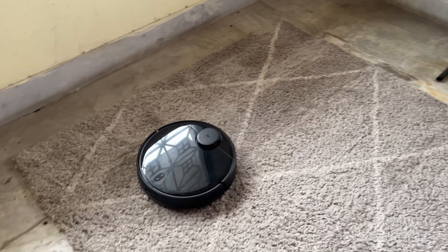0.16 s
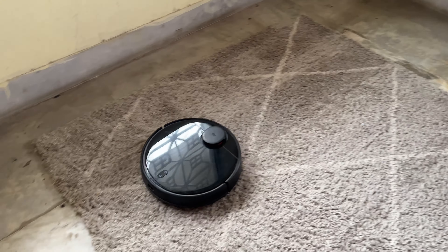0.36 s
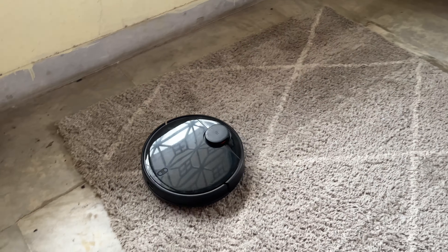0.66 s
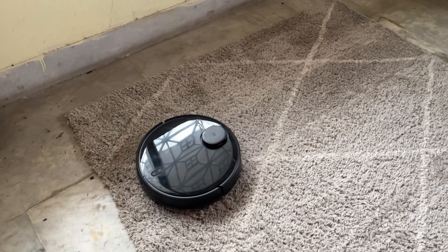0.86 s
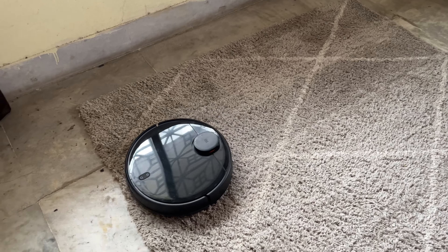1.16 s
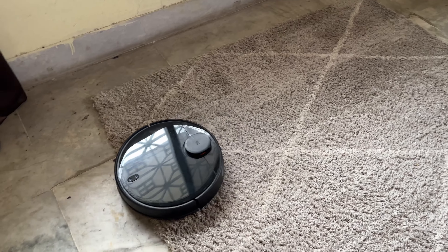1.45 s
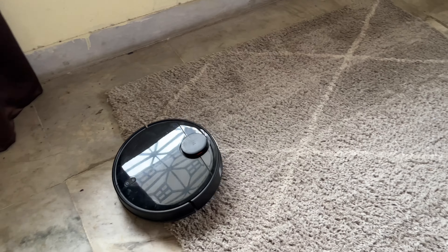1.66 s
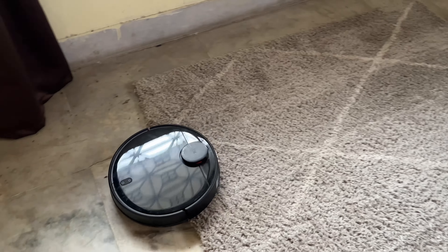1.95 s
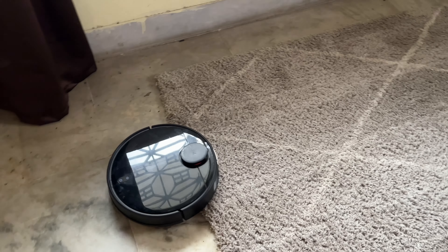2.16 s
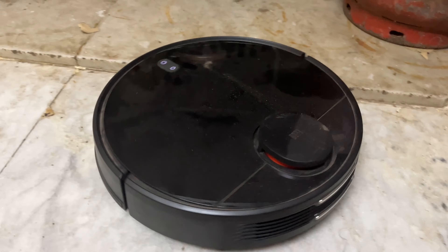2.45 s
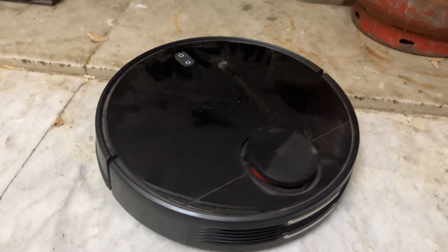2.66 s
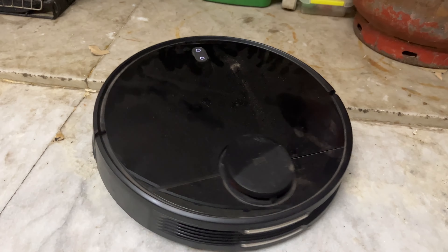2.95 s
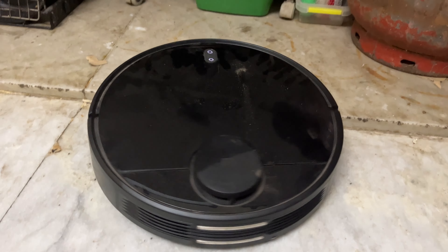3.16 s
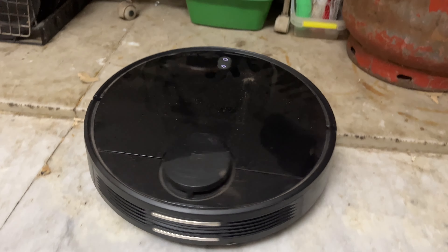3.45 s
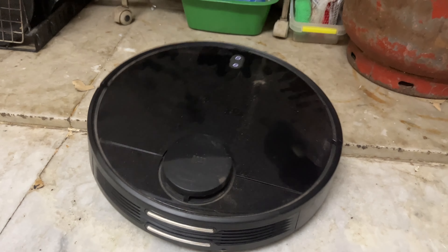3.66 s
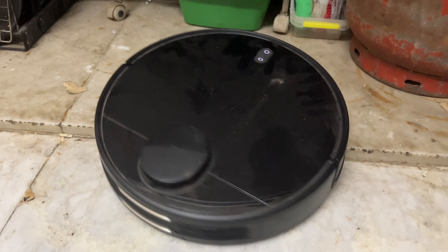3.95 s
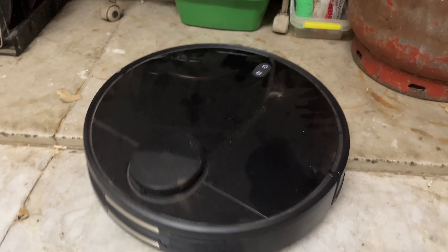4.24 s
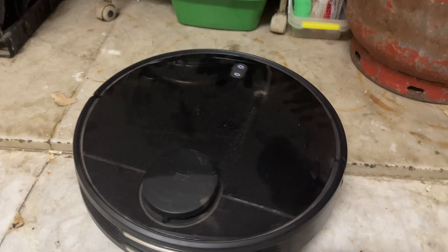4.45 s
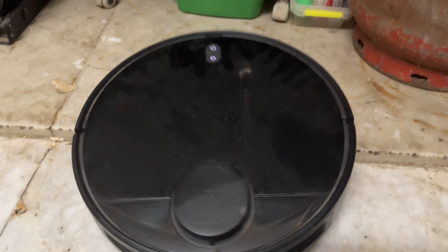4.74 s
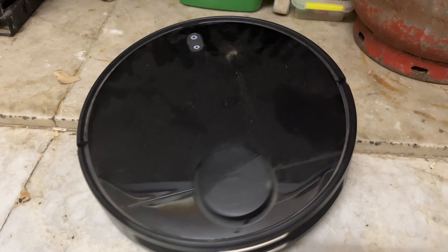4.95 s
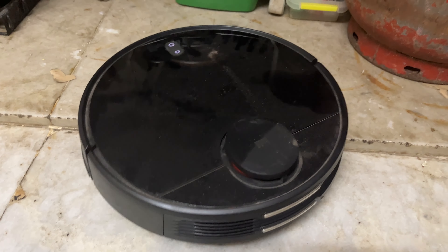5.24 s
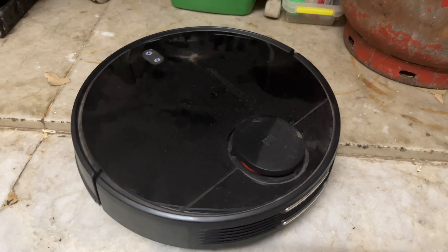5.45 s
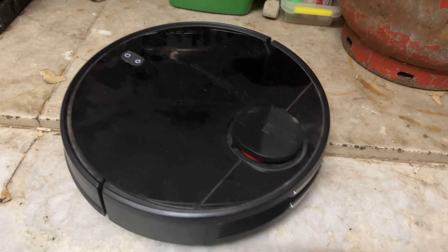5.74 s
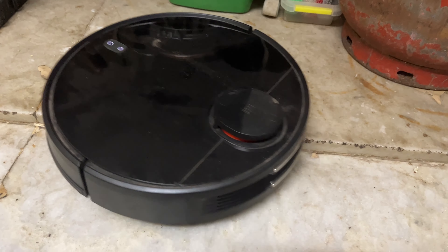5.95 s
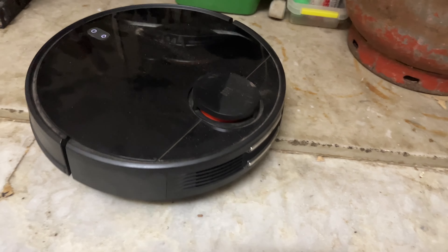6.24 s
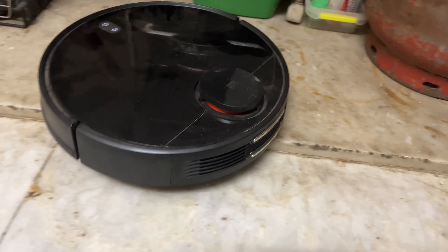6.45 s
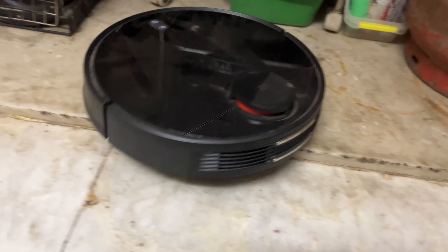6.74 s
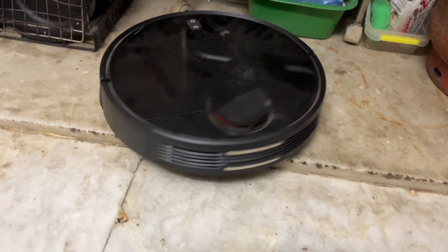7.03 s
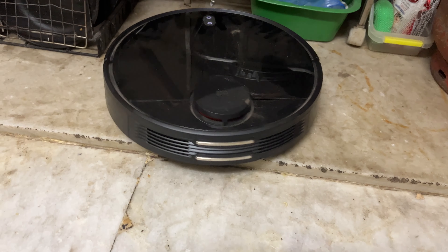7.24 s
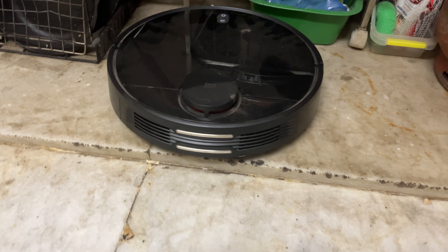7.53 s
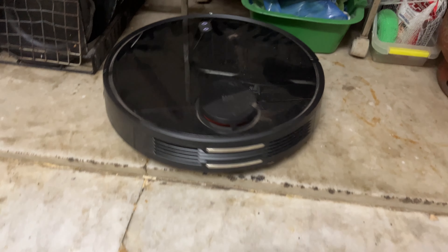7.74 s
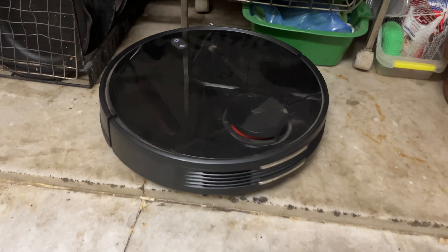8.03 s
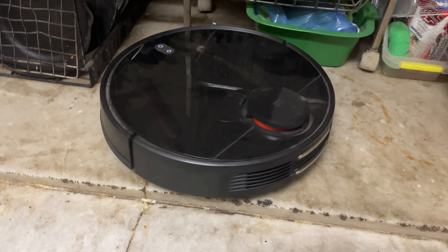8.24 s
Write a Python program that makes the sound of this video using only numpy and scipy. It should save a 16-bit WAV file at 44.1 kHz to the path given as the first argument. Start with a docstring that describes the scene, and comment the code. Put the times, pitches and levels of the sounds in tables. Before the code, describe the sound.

A robot vacuum works indoors, heard in stereo without a break in its motor. From 0 to 2.4 s it is a few steps away on carpet: soft airy drone, low fan hum, thin steady whine and a fluttering, breaking roller tone around the middle pitches. Muffled bumps come at about 1.8-1.9 and 2.3 s. At 2.4 s the sound jumps close, onto hard tile, louder and fuller, with rushing air, brush rasp and uneven wheel rumble. Hollow plastic knocks cluster at 2.8 and 3.3 s; the sharpest crack starts a clatter at 3.9-4.1 s, where airy whoosh and whine swell. More knocks land around 4.6, 4.75 and 5.1 s, with short echoes. The whirring then runs on, softer rattles returning at 6.7-7.2 s. From 7.4 s a deep boom pulses under the motor until the end at about 8.4 s.

```python
"""A small robot vacuum indoors: a few steps away on carpet, then from 2.4 s close by on a tiled floor.
Air and wheels are noise shaped in five layers; motor, fan, blades, roller and boom are wavering partials.
Knocks over joints and sills are noise blows into resonances of the shell, with sparse room echoes.
A stereo pair of ports is built as sum and difference, each with its own colour."""
import sys
import numpy as np
from scipy import signal
from scipy.fft import rfft, irfft
from scipy.io import wavfile
from scipy.ndimage import uniform_filter1d

SR = 44100
rng = np.random.default_rng(int(sys.argv[2]) if len(sys.argv) > 2 else 0)


def persist_wave(psi):
    """Save psi, clipped to +-1, as 16-bit WAV."""
    counts = np.round(np.clip(psi, -1, 1) * 32767).astype(np.int16)
    wavfile.write(sys.argv[1], SR, np.atleast_2d(counts).T)


N = 369116
CLOSE_S = 2.4  # the scene changes at once from far to close: far tables before, near tables after


def amp(db):
    """Gain for a level in dB."""
    return 10 ** (np.asarray(db) / 20)


def unit_rms(x):
    """Scales to rms 1."""
    return x / np.sqrt(np.mean(x ** 2) + 1e-20)


def at_frequencies(table, hz):
    """Columns of a spectral table, interpolated on a log-frequency axis."""
    f, *columns = np.transpose(table)
    return np.squeeze([np.interp(np.log(hz + 1), np.log(f + 1), c) for c in columns])


def at_samples(rows):
    """Sample indices spanned by a time table, and its columns at each of them."""
    s, *columns = np.transpose(rows)
    at = np.arange(round(s[0] * SR), min(round(s[-1] * SR), N))
    return at, np.array([np.interp(at / SR, s, c) for c in columns])


def wander(count, rate_hz):
    """Slow random curve: smoothed noise of rms 1, stepped every 64 samples."""
    steps = rng.standard_normal(N // 64 + 2)
    width = max(round(SR / 64 / rate_hz), 1)
    smooth = unit_rms(uniform_filter1d(uniform_filter1d(steps, width), width))
    return np.interp(np.arange(count) / 64, np.arange(len(steps)), smooth)


def peak(hz, centre_hz, width_hz):
    """Resonance curve of height 1, falling to half at half the width."""
    return 1 / (1 + (2 * (hz - centre_hz) / width_hz) ** 2)


def resonance(hz, centre_hz, width_hz):
    """Spectrum of a steep causal resonance."""
    return 1 / (1 + 2j * (hz - centre_hz) / width_hz) ** 2 / np.sqrt(width_hz)


def tone(hz, db, waver_db, drift, side_gain, rate_hz=8.0):
    """Partial wavering in level and pitch; its port difference is shifted about a quarter turn from the sum."""
    turns = np.cumsum(hz * (1 + drift * wander(len(hz), 2.92 * rate_hz))) / SR + rng.random()
    level = np.sqrt(2) * amp(db + waver_db * wander(len(hz), rate_hz))
    phase = 2 * np.pi * turns
    return level * np.array([np.cos(phase), side_gain * np.cos(phase + 1.6)])


# port difference relative to sum: f/Hz, level/dB
SIDE_COLOUR = [(50, -5), (130, -14.5), (300, -14.5), (600, -5.5), (1200, 0.5), (2200, -4.5), (4000, -3.5),
               (6500, 0.5), (9700, -0.5), (14400, 3)]
# share of the difference that follows the sum: f/Hz, in-step share [-], quarter-turn share [-]
SIDE_LINK = [(100, .1, 0.17), (500, 0.26, 0.39), (1190, 0.26, 0.64), (4000, 0.29, 0.39), (8000, 0.01, 0.51),
             (14000, 0.01, 0.44)]


def port_difference(near, diffuse):
    """Difference spectrum: part follows the sum, the rest is diffuse, at constant total power."""
    hz = np.linspace(0, SR / 2, len(near))[:, None]
    step, quarter = at_frequencies(SIDE_LINK, hz[:, 0])[..., None]
    linked = (step + 1j * quarter) * near
    free = np.sqrt(1 - step ** 2 - quarter ** 2) * diffuse
    return amp(at_frequencies(SIDE_COLOUR, hz[:, 0]))[:, None] * (linked + free)


# These five tables hold one entry per place (far, near).
# spectrum of the port sum: f/Hz, level/dB per Hz
SUM_COLOUR = [
    [(40, -27), (56, -7), (120, -1), (260, -6.5), (437, -8.5), (700, -19.5), (1030, -8.5), (1560, -23),
     (2430, -17), (4000, -23), (7400, -30.5), (9900, -54), (13200, -47), (15500, -64)],
    [(40, -29), (60, -11), (92, 0), (135, -1.5), (300, 1), (480, -3.5), (953, -3.5), (1550, -11.5),
     (2400, -13.5), (3880, -19.5), (7240, -27), (9890, -54.5), (13200, -50.5), (15500, -64)],
]
# casing and duct resonances: f/Hz, width/Hz, level/dB
DUCT_MODES = [
    [(321, 14, 5.5), (480, 98, 3), (777, 10, -4), (1760, 37, 3.5), (2400, 82, 7), (3350, 81, 4),
     (3820, 190, 5.5)],
    [(316, 7.9, 4.5), (350, 81, 4), (458.2, 9.2, 15), (548.4, 23, 9.5), (751, 3.8, 6), (1075, 43, 4),
     (2257, 125, 5), (2494, 360, 5), (3070, 60, -3), (3830, 280, 3)],
]
# air stream: t/s, body drone level/dB, brush rasp level/dB, air hiss level/dB, exhaust fizz level/dB
STREAM_LEVELS = [
    [(0, -49, -54, -59, -66.5), (.45, -47.5, -53, -58, -66.5), (.85, -48.5, -53, -57.5, -66.5),
     (1.25, -48.5, -53.5, -57.5, -68), (1.9, -45.5, -52, -54.5, -65), (2.4, -43.5, -51, -54.5, -65.5)],
    [(2.4, -44, -47.5, -47.5, -53), (2.45, -40.5, -45.5, -48.5, -54.5), (2.58, -39.5, -44, -48.5, -57.5),
     (2.7, -43.5, -43, -48, -56.5), (2.95, -40, -42, -50, -54.5), (3.17, -43, -43, -48.5, -56.5),
     (3.42, -41.5, -42.5, -44.5, -53.5), (3.85, -44, -44, -47.5, -56), (4.15, -43, -47, -47.5, -54),
     (5.0, -43, -44, -47.5, -54.5), (5.5, -42.5, -44.5, -48, -57.5), (5.85, -43.5, -43, -47, -54.5),
     (6.4, -43, -43.5, -45, -54), (6.9, -41.5, -43, -50, -55), (7.35, -44, -44.5, -46, -52),
     (7.9, -47, -47.5, -47, -53.5), (8.37, -45, -43.5, -51.5, -57.5)],
]
# swells as the outlet turns: t/s, whoosh level/dB, sizzle level/dB
OUTLET_SWELLS = [
    [(0, -0.5, 1.5), (1.2, -0.8, 0.3), (2.4, 0.7, -2)],
    [(2.4, -0.3, -1), (2.85, -4.3, 1.5), (3.16, -0.8, 4.5), (3.4, -3, 3.5), (3.76, -5, 3.5), (4.1, 8, 1),
     (4.4, 6.5, 1), (4.96, 2.6, 1), (5.4, -0.6, -0.5), (5.8, .3, -3.5), (6.17, -1.2, -1), (6.5, -3, -5.5),
     (6.9, .3, 1), (7.2, 3, -1), (7.52, 5, -3.5), (8.37, 0, -1)],
]
# wheel rumble: t/s, f/Hz, level/dB
WHEEL_RUMBLE = [
    [(0, 105, -54), (.6, 102, -54.5), (1.35, 101, -57), (1.6, 76, -53), (1.9, 97, -50.5), (2.4, 90, -57.5)],
    [(2.4, 88, -48), (2.75, 79.5, -44.5), (2.95, 90, -48.5), (3.3, 90, -41.5), (3.6, 105, -48.5),
     (3.9, 106, -46.5), (4.08, 86.5, -38), (4.4, 84.5, -49), (4.8, 91.4, -38.5), (5.12, 90.5, -48.5),
     (5.45, 96, -41), (6.35, 99, -51.5), (6.75, 105, -46.5), (7.25, 93.5, -46), (7.7, 93, -40.5),
     (7.95, 96, -43.5), (8.12, 99.5, -44.5), (8.37, 99, -43.5)],
]
WHEEL_PEAK_DB, WHEEL_WIDTH_HZ = (3.5, 11.5), 28  # peak: far, near
LAYER_EDGES_HZ = (0, 170, 900, 3000, 8500, 30000)  # wheels, drone, rasp, hiss, fizz
GUSTS_DB = (0.3, 1.12, 0.26, 0.75, 0.99)  # rms, per layer
OUTLET_HZ, OUTLET_WIDTH_HZ = (2660, 5100), (680, 1020)  # whoosh, sizzle


def air_and_wheels():
    """Turbulence and rolling: gusting noise layers coloured by ducts, wheels and drifting patches."""
    out, hz = np.zeros((2, N)), np.fft.rfftfreq(2048, 1 / SR)
    places = zip(STREAM_LEVELS, OUTLET_SWELLS, WHEEL_RUMBLE, WHEEL_PEAK_DB, SUM_COLOUR, DUCT_MODES)
    for stream, outlet, rumble, peak_db, colour, ducts in places:
        at, air_db = at_samples(stream)
        wheel_hz, wheel_db = at_samples(rumble)[1]
        frames = np.minimum(np.arange(len(at) // 512 + 6) * 512, len(at) - 1)
        a, b, c, d, patches = rng.standard_normal((len(frames), 1025, 5)).T
        near, diffuse = a + 1j * b, c + 1j * d

        # standing waves shift as the machine turns
        patches_db = 2.18 * unit_rms(uniform_filter1d(uniform_filter1d(patches, 6, 0), 25, 1))
        colour_db = at_frequencies(colour, hz) + sum(db * peak(hz, f, w) for f, w, db in ducts)
        wheels_db = peak_db * peak(hz[:, None], wheel_hz[frames], WHEEL_WIDTH_HZ)
        shape = amp(colour_db[:, None] + wheels_db + patches_db)

        layers = zip(LAYER_EDGES_HZ, LAYER_EDGES_HZ[1:], (wheel_db, *air_db), GUSTS_DB)
        for lo, hi, db, gust_db in layers:
            band = (hz >= lo) & (hz < hi)
            gain = amp(db + gust_db * wander(len(at), 27.0))[frames]
            shape[band] *= gain / np.sqrt((shape[band] ** 2).sum(0).mean())
        level = np.sqrt((shape ** 2).sum(0).mean())

        swells_db = sum(db[frames] * np.exp(-((hz[:, None] - f) / w) ** 2)
                        for db, f, w in zip(at_samples(outlet)[1], OUTLET_HZ, OUTLET_WIDTH_HZ))
        z = shape * np.array([near, port_difference(near, diffuse)]) * amp(swells_db)
        noise = signal.istft(z, nperseg=2048, noverlap=1536)[1][:, :len(at)]
        out[:, at] += noise * level / noise[0].std()  # swells tilt the balance, mean level holds
    return out


# one curve per place: t/s, 2nd-order f/Hz, order 2 level/dB, order 4 level/dB, order 6 level/dB
MOTOR_WHINE = [
    [(0, 1432, -78, -66, -80), (.14, 1432, -75, -69, -77), (.3, 1432, -73, -63, -76),
     (.54, 1432, -78, -61, -76), (.66, 1433, -76, -76, -69), (.79, 1433, -72, -62, -75),
     (1.0, 1432, -65, -60, -70), (1.12, 1432, -68, -71, -67), (1.25, 1432, -68, -55.5, -64),
     (1.5, 1434, -65, -62, -76), (1.64, 1436, -60, -72, -69), (1.85, 1432, -60, -58, -70),
     (2.05, 1432, -54.5, -62, -74), (2.27, 1432, -57, -61, -66), (2.4, 1432, -58, -66, -72)],
    [(2.4, 1408, -61, -60, -72), (2.7, 1401, -60, -60, -61), (2.95, 1401, -51.5, -62, -65),
     (3.15, 1400, -48, -61, -64), (3.3, 1400, -53, -52.5, -55), (3.65, 1400, -57.5, -59, -56.5),
     (3.85, 1400, -54, -65, -66), (4.07, 1406, -44, -70, -64), (4.09, 1408, -43, -55, -62),
     (4.16, 1410, -43.5, -50.5, -57), (4.3, 1411, -42, -48.5, -57), (4.5, 1411, -47.5, -53, -65),
     (4.6, 1411, -48, -53, -63), (4.72, 1411, -53, -56, -57), (4.95, 1409, -59, -80, -54),
     (5.3, 1411, -57, -65, -60), (5.5, 1412, -53.5, -59, -62), (5.8, 1412, -51, -55, -68),
     (6.1, 1410, -54, -62, -58), (6.45, 1406, -55, -62, -67), (6.7, 1403, -48.5, -59, -55),
     (7.0, 1401, -53.5, -69, -58), (7.35, 1407, -55, -57, -59), (7.55, 1409, -52, -60, -66),
     (7.72, 1409, -47.5, -59, -76), (8.0, 1405, -53.5, -64, -77), (8.15, 1403, -62, -57, -63),
     (8.37, 1400, -53, -70, -62)],
]
# motor orders wavering about one fixed level per place: order [-], far level/dB, near level/dB
FIXED_LEVEL_ORDERS = [(.5, -64.5, -57), (2.5, -79, -60), (3, -71, -91), (9, -68.5, -63.5), (10, -74, -86),
                      (15, -88, -72), (18, -78, -66)]


def motor():
    """Motor whine: thin partials at multiples of one shaft speed."""
    out = np.zeros((2, N))
    for place, rows in enumerate(MOTOR_WHINE):
        at, (second_hz, *levels_db) = at_samples(rows)
        for k, (db, waver_db) in enumerate(zip(levels_db, (2.2, 3.5, 3.5))):
            out[:, at] += tone((k + 1) * second_hz, db, waver_db, 0.0013, 0.85, rate_hz=14.0)
        for order, *place_db in FIXED_LEVEL_ORDERS:
            out[:, at] += tone(order * second_hz / 2, place_db[place], 4., 0.0013, 0.85, rate_hz=9.)
    return out


# t/s, shaft f/Hz, order 1 level/dB, order 2 level/dB
FAN_HUM = [(0, 212.9, -49.5, -65), (2.0, 214, -46, -57), (2.36, 212.6, -51, -76), (2.46, 217, -44, -40),
           (2.7, 212.1, -47.5, -56), (4.0, 212.4, -47.5, -51.5), (5.2, 212.1, -48.5, -66),
           (6.3, 214.6, -48, -69), (8.37, 213.2, -53, -65)]


def fan():
    """Fan hum: first two orders of the shaft speed."""
    out = np.zeros((2, N))
    at, (hz, first_db, second_db) = at_samples(FAN_HUM)
    out[:, at] += tone(hz, first_db, 0.91, 0.0065, 0.12)
    out[:, at] += tone(2 * hz, second_db, 3.5, 0.00603, 0.23)
    return out


BLADES_HZ, BLADES_DB = 13660, (-86, -70)  # level: far, near


def blades():
    """Thin top whistle of the blades: one unsteady partial."""
    at = np.arange(N)
    level_db = np.where(at < CLOSE_S * SR, *BLADES_DB)
    return tone(np.full(N, BLADES_HZ), level_db, 3., .002, 0.92, rate_hz=25.)


# roller singing in the pile: t/s, f/Hz, level/dB
ROLLER_SONG = [(0, 1045, -55), (.07, 1064, -46), (.13, 1058, -53), (.17, 1072, -49), (.19, 1050, -61),
               (.21, 1015, -47), (.26, 1018, -52), (.29, 1058, -47.5), (.37, 1064, -52), (.4, 1020, -58),
               (.43, 1018, -47), (.46, 1040, -57), (.5, 1070, -46), (.58, 1056, -45), (.72, 1065, -45.5),
               (.77, 1040, -58), (.82, 1048, -44), (.93, 1042, -49.5), (1.1, 1047, -51), (1.15, 999, -50),
               (1.24, 1000, -52), (1.32, 1025, -63), (1.44, 992, -48), (1.49, 1000, -61), (1.52, 995, -57),
               (1.58, 1004, -63), (1.65, 1021, -54), (1.7, 1030, -63), (1.77, 1030, -49), (1.84, 1045, -62),
               (1.95, 1000, -66), (2.05, 1009, -58.5), (2.16, 1005, -57), (2.24, 960, -55), (2.3, 930, -53),
               (2.4, 900, -62)]


def roller():
    """Roller singing in carpet pile: one partial that flutters and breaks."""
    out = np.zeros((2, N))
    at, (hz, db) = at_samples(ROLLER_SONG)
    out[:, at] += tone(hz, db, 2.2, 0.008, 0.53, rate_hz=65.)
    return out


# swells of the low boom: start t/s, length t/s, top level/dB
BOOM_SWELLS = [(1.501, 0.22, -55), (1.85, 0.63, -52.5), (2.423, 0.21, -56), (2.757, .14, -53),
               (3.203, 0.25, -51), (3.5, 0.22, -52), (3.928, 0.32, -51), (4.32, 0.11, -49),
               (4.564, 0.43, -53), (5.1, 0.96, -46.5), (6.265, 0.27, -48), (6.7, 0.46, -48.5),
               (7.39, 0.24, -32.5), (7.553, 0.24, -31), (7.813, 0.2, -34.5), (8.046, 0.23, -29),
               (8.2, 0.31, -36.5)]
BOOM_HZ, BOOM_IDLE_DB = 51.4, (-70, -56)  # idle: far, near
SWELL_POWER = 0.66  # exponent on a half sine; under 1 = flatter top


def boom():
    """Low hum: one partial whose idle power is joined by half-sine swells."""
    t = np.arange(N) / SR
    power = amp(np.where(t < CLOSE_S, *BOOM_IDLE_DB)) ** 2
    for start_s, length_s, db in BOOM_SWELLS:
        arch = np.sin(np.pi * np.clip((t - start_s) / length_s, 0, 1))
        power += amp(db) ** 2 * arch ** (2 * SWELL_POWER) * (t < start_s + length_s)
    return np.sqrt(power) * tone(np.full(N, BOOM_HZ), 0, 1.7, .03, 0.06, rate_hz=9.)


# t/s, thud, clack, crack, snap, tick level/dB, struck base f/Hz, struck panel f/Hz
KNOCK_EVENTS = [(1.812, -52, -49, -46, -52, -67, 334, 1148), (1.834, -56, -55, -54, -56, -61, 400, 1100),
                (1.858, -39, -45.5, -50, -60, -60, 408, 1390), (1.88, -44, -54, -52, -58, -64, 604, 1000),
                (1.904, -37, -44, -45, -51, -55, 460, 1470), (1.93, -50, -62, -54, -64, -71, 380, 1250),
                (2.286, -43, -45, -58, -67, -72, 248, 1950), (2.439, -59, -38, -39, -55, -66, 500, 1840),
                (2.479, -36, -42, -53, -63, -60, 405, 1260), (2.783, -47, -31, -47, -52, -59, 422, 1470),
                (2.791, -30, -30, -38, -53, -65, 350, 1350), (2.798, -40, -41, -46, -52, -62, 350, 1877),
                (2.813, -28, -30.5, -41, -45, -58, 790, 1100), (2.822, -24, -36, -38, -52, -64, 417, 1300),
                (2.851, -33, -42, -52, -54, -66, 470, 1000), (2.89, -32.5, -38.5, -45, -46, -58, 420, 1360),
                (2.919, -32, -47, -48, -56, -60, 385, 1250), (3.281, -26.5, -33, -41, -47, -53, 730, 1030),
                (3.289, -26.5, -33, -38, -54, -62, 454, 1003), (3.306, -45, -42, -49, -55, -62, 450, 1870),
                (3.935, -30, -27, -28.5, -33, -50, 400, 1850),
                (3.938, -30, -26, -25.5, -24.5, -25, 676, 1470),
                (3.956, -27.5, -36, -27, -45, -49, 802, 1480), (3.963, -29, -37, -39, -52, -57, 570, 1000),
                (3.986, -33, -39, -37, -51, -56, 700, 1200),
                (4.016, -25, -21.5, -26.5, -41, -56, 427, 1370),
                (4.03, -23.5, -30, -31, -50, -62, 590, 1440), (4.039, -29.5, -35, -38, -41, -57, 476, 1380),
                (4.067, -28.5, -38, -36, -49, -62, 400, 1300), (4.086, -40, -29, -43, -51, -62, 255, 1360),
                (4.111, -39.5, -44, -46, -57, -74, 355, 1330),
                (4.557, -35.5, -39, -50, -53, -65, 414, 1380), (4.595, -36, -42, -41, -55, -73, 318, 1407),
                (4.753, -24, -42, -26.5, -32.5, -37.5, 550, 1930),
                (4.758, -21, -27.5, -38, -52, -46, 315, 1004), (4.766, -24, -30, -39, -54, -58, 650, 1110),
                (4.797, -44, -37, -46, -47, -50, 420, 1740), (4.869, -33, -41, -43, -62, -62, 480, 1149),
                (5.062, -27.5, -27, -34.5, -45, -55, 510, 1830),
                (5.079, -32, -32, -34, -40, -47, 610, 1050), (5.121, -37, -45, -33, -51, -62, 382, 1950),
                (5.124, -33, -27, -46, -57, -67, 590, 1220), (5.133, -30.5, -50, -54, -53, -64, 430, 1400),
                (5.143, -33, -55, -46, -57, -70, 403, 1400), (5.172, -32.5, -40, -41, -53, -68, 480, 1310),
                (6.684, -33, -40, -42, -48, -60, 500, 1400), (6.692, -28, -30, -41, -45, -54, 720, 1060),
                (6.701, -32, -48, -43, -52, -64, 510, 1280), (6.716, -43, -46, -46, -56, -67, 498, 1000),
                (6.735, -38, -53, -50, -57, -61, 440, 1110), (6.849, -35, -32.5, -43, -57, -72, 585, 1040),
                (6.885, -36.5, -47, -44, -48, -66, 507, 1300), (7.021, -40, -27, -32, -44, -52, 870, 1890),
                (7.025, -28, -36, -35, -48, -53, 530, 1100), (7.041, -40, -40, -38, -45, -51, 600, 1490),
                (7.048, -33.5, -48, -36, -52, -56, 565, 1200),
                (7.065, -34.5, -47, -51, -56, -60, 420, 1420), (7.206, -35, -54, -52, -52, -60, 600, 1680)]
# shell modes before detuning: f/Hz, width/Hz, level/dB
SHELL_MODES = [(291, 120, 0), (426, 110, 0.5), (630, 420, 2.5), (880, 340, 9.5), (1233, 730, 16),
               (2040, 880, 15), (2180, 1360, 13), (3240, 1080, 13), (3780, 1600, 13), (5320, 5100, 19.5),
               (6940, 2100, 18.5), (8900, 780, -10), (10800, 3600, 21)]
PART_EDGES_HZ = (0, 900, 2100, 4600, 7600, 30000)  # thud, clack, crack, snap, tick
PART_DECAY = (0.89, 0.97, 0.52, 0.49, 0.28)  # scales both rattle decays, per part
RATTLE_BASE_T60_S, TAIL_BASE_T60_S, CONTACT_T60_S = .07, 0.33, .03
CHATTER_DB, CHATTER_S = 4.5, .012  # loose parts chatter, fully after this long
RISE_S, RISE_S_PER_DB, HARD_DB = .001, .0001, -24  # knocks below HARD_DB rise more slowly
KNOCK_PAN_DB = 0.5  # left over right


def knocks():
    """Short blow on base and panel plus a rattle into shell modes; the treble dies first."""
    out, t = np.zeros((2, N + SR)), np.arange(8192) / SR
    hz = np.fft.rfftfreq(len(t), 1 / SR)
    pan = np.tanh(KNOCK_PAN_DB * np.log(10) / 40)
    for s, *parts_db, base_hz, panel_hz in KNOCK_EVENTS:
        rise_s = RISE_S + RISE_S_PER_DB * max(HARD_DB - max(parts_db), 0)
        noise = rng.standard_normal((2, len(t))) * np.minimum(t / rise_s, 1)
        chatter = np.repeat(rng.standard_normal(len(t) // 128), 128)
        noise *= amp(CHATTER_DB * np.minimum(t / CHATTER_S, 1) * chatter)

        # each blow detunes the shell; neighbouring modes have opposite sign
        modes = [(f, (-1) ** k * amp(db) * resonance(hz, f * rng.uniform(0.854, 1.094), w))
                 for k, (f, w, db) in enumerate(SHELL_MODES)]
        struck = amp(27) * resonance(hz, base_hz, 270), amp(26) * resonance(hz, panel_hz, 520), 0, 0, 0
        contact = rfft(noise * amp(-60 * t / CONTACT_T60_S))

        blow = np.zeros((2, len(hz)), complex)
        for lo, hi, db, decay, hit in zip(PART_EDGES_HZ, PART_EDGES_HZ[1:], parts_db, PART_DECAY, struck):
            rattle = amp(-60 * t / (RATTLE_BASE_T60_S * decay))
            rattle += 0.2 * amp(-60 * t / (TAIL_BASE_T60_S * decay))
            part = rfft(noise * rattle) * sum(mode for f, mode in modes if lo <= f < hi)
            part += contact * hit
            loudest = uniform_filter1d(irfft(part[0]) ** 2, 300).max()  # 7 ms mean power
            blow += amp(db) * part / np.sqrt(loudest)

        side = port_difference(*blow[..., None])[:, 0] + pan * blow[0]
        at = round(s * SR)
        out[:, at:at + len(t)] += irfft([blow[0], side]) * np.minimum(t[::-1] * 20, 1)
    return out[:, :N]


# f/Hz, t60/s
ROOM_T60 = [(200, 0.51), (1000, 0.24), (4000, 0.37), (12000, 0.29)]


def room(x):
    """Sparse echoes of random sign, each band dying at its own speed."""
    taps = np.zeros((2, SR // 2))
    slots = np.arange(300, SR // 2 - 20, 20)
    at = slots + rng.integers(0, 20, (2, len(slots)))
    np.put_along_axis(taps, at, rng.choice([-1., 1.], at.shape), 1)
    hz, t, z = signal.stft(taps, SR, nperseg=256)
    decay = amp(-60 * t / at_frequencies(ROOM_T60, hz)[:, None])
    tail = signal.istft(z * decay, SR, nperseg=256)[1]
    return signal.fftconvolve(x, tail / np.linalg.norm(tail[0]), axes=1)[:, :N]


def scene():
    """All sources as sum and difference of the two ports."""
    blows = knocks()
    running = air_and_wheels() + motor() + fan() + blades() + roller() + boom()
    return running + blows + amp(-3.5) * room(blows)


# near-empty treble bands, one list for port sum, one for difference: low f/Hz, high f/Hz, level/dB
TREBLE_GAPS = [
    [(7650, 9400, -42), (14450, 30000, -40)],
    [(10700, 13300, -40)],
]


def gapped(x):
    """Linear-phase filters that empty the treble gaps of sum and difference."""
    hz = np.linspace(0, SR / 2, 513)
    loss_db = [sum(db * ((hz > lo) & (hz < hi)) for lo, hi, db in bands) for bands in TREBLE_GAPS]
    filters = [signal.firwin2(511, hz, amp(db), fs=SR) for db in loss_db]
    return signal.oaconvolve(x, filters, "same", axes=1)


FILL_DB, FILL_S = -49, 0.0064  # gaps fill from this mean level of gap content, over this window
EDGE_HZ = 15300


def record(dry):
    """Treble gaps fill only in the loudest cracks; then left and right, and the band limit."""
    kept = gapped(dry)
    removed = dry - kept
    power = abs(uniform_filter1d(removed[0] ** 2, round(FILL_S * SR)))
    fill = np.clip((10 * np.log10(power + 1e-12) - FILL_DB) / 6, 0, 1)  # full 6 dB above FILL_DB
    mid, side = kept + fill * removed
    pair = np.array([mid + side, mid - side])
    lowpass = signal.firwin(511, EDGE_HZ, window=("kaiser", 9), fs=SR)
    return signal.oaconvolve(pair, lowpass[None], "same")


dry = scene()
out = record(dry)
persist_wave(out)
```